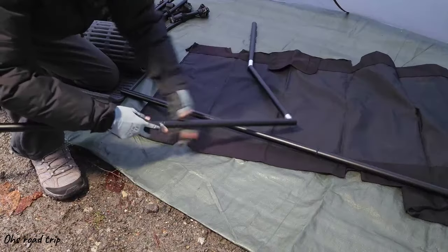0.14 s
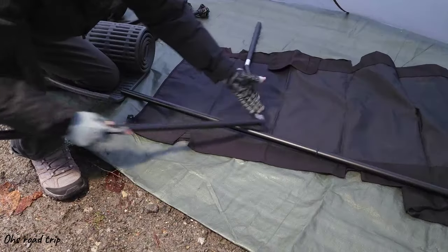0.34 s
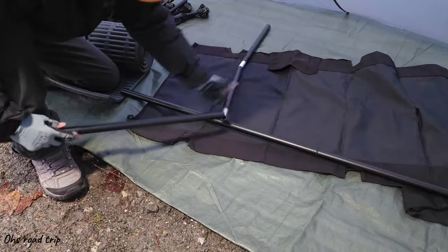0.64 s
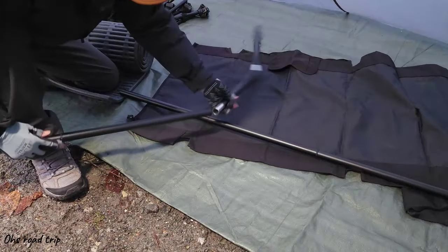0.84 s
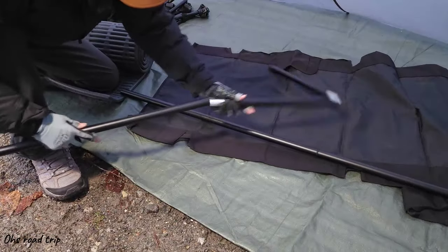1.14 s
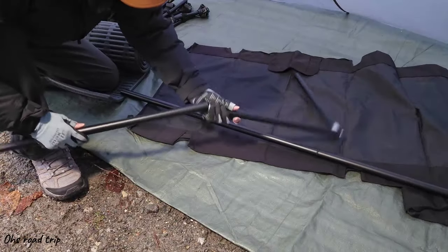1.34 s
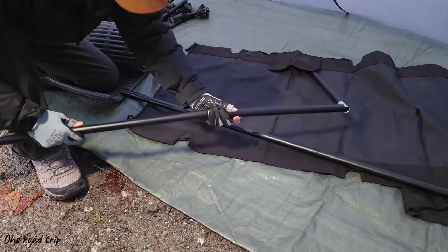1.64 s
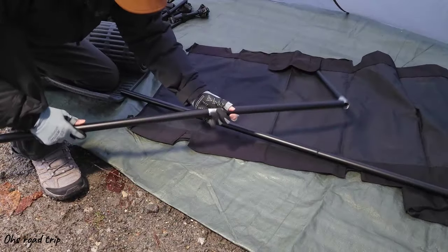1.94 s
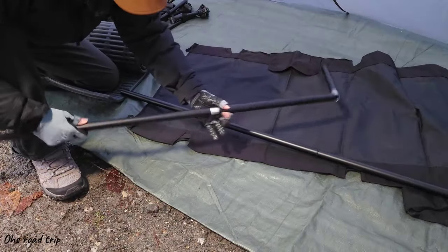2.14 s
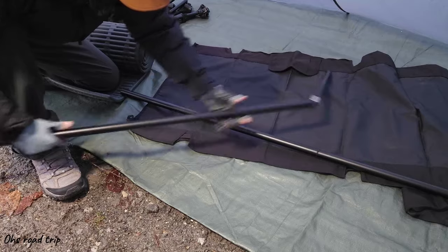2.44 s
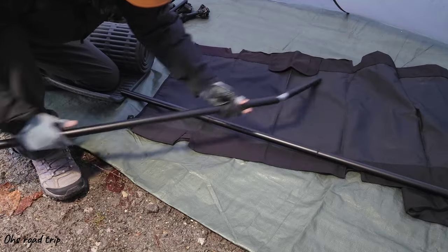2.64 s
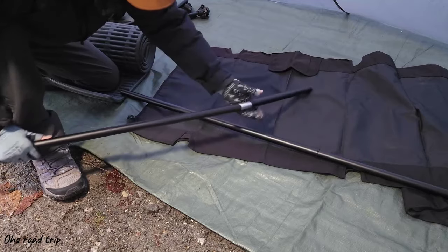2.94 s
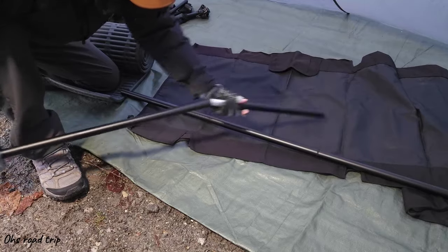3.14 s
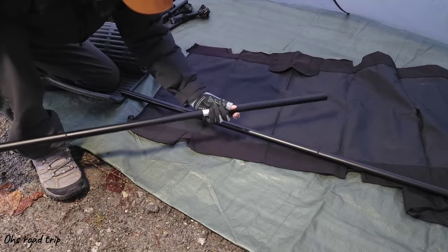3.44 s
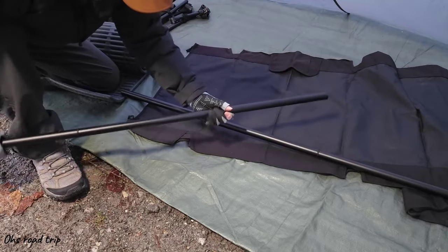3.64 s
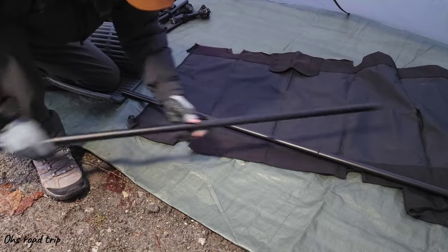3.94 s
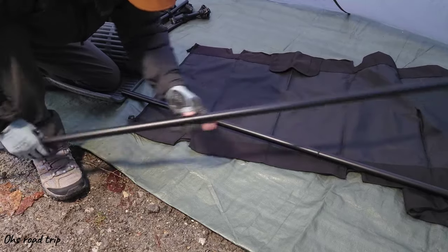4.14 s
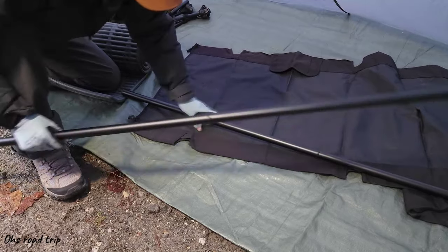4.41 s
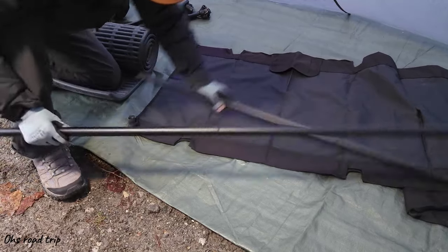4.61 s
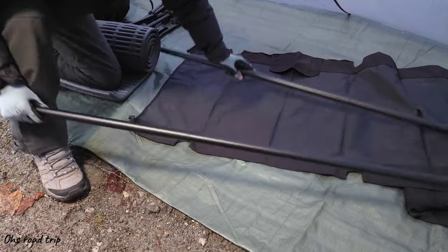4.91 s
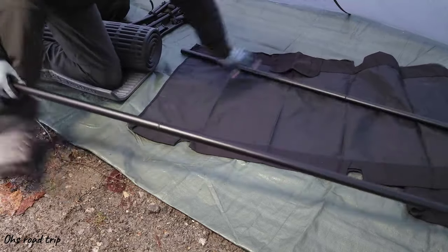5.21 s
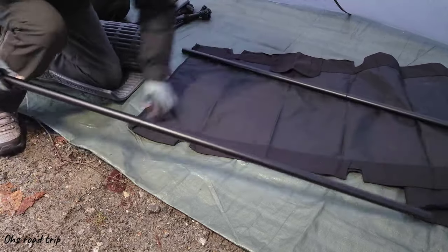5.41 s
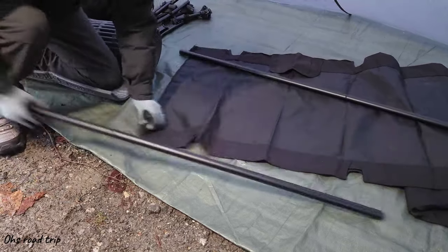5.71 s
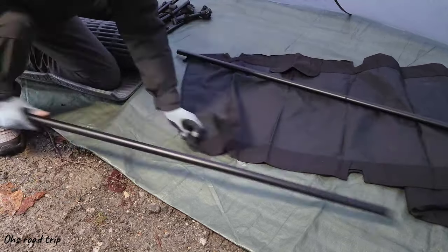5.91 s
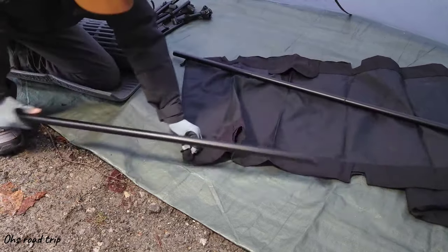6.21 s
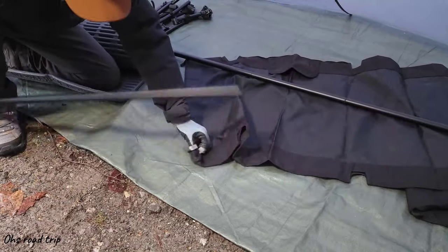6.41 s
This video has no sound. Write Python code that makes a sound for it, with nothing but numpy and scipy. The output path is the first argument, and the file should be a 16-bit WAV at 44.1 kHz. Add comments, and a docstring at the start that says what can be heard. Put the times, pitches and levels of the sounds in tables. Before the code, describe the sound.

Close, crisp clacks of thin metal tubes: a quick rattling cluster near the first second, then sharp lone snaps around two and three and a half seconds, and harder knocks with a dull ground bump near five. Short raspy slides and dry rustles of gloves, sleeves and canvas fill the gaps. Close stereo pickup, short soft fabric reflections, faint low motor drone far away.

```python
"""Putting up a camp cot

Jointed metal poles slide and snap into their sockets, then knock together: noise bursts over ringing modes.
Gloves, sleeves and canvas rub between the blows as swelling filtered noise; dull bumps land on the groundsheet.
The tent adds a short splash to knocks, slides and cloth. Two drifting tones drone as a motor far off."""
import sys
import numpy as np
from scipy import signal
from scipy.fft import rfft, irfft
from scipy.io import wavfile

SR = 44100
rng = np.random.default_rng(int(sys.argv[2]) if len(sys.argv) > 2 else 0)


def pcm_store(signal):
    """Save signal as 16-bit PCM."""
    levels = np.round(np.clip(np.atleast_2d(signal), -1, 1) * 32767)
    wavfile.write(sys.argv[1], SR, levels.astype(np.int16).T)


N = 289296
TIME = np.arange(N) / SR
FREQ = np.maximum(np.fft.rfftfreq(N, 1 / SR), 1)

# Levels in the tables are mix levels before the layer trims set in each function.
# knocks of metal on metal: start_s, level_db, clack_db, sizzle_db, ring_db (these three relative to level),
# body_hz, rattle_t60_s, contact_s
METAL_KNOCKS = [(.883,-19.5,0,-10,-6,1433,0.31,0.005), (0.924,-27.5,-4,9.5,-17,3870,.27,0.012),
                (1.046,-24.5,2,-4,-3,2293,0.11,0.0021), (1.148,-17.5,-1,-8,-11.5,2983,0.19,0.0027),
                (1.384,-48.5,13,-13,-11,1855,.18,0.0024), (1.552,-35,-2,-24,5,1960,0.17,0.00063),
                (2.128,-37,-16,-12,10,2280,.12,0.0023), (2.1703,-9,-3.5,-3.5,-7.5,2450,.21,0.00078),
                (2.287,-49.5,5,-15,-7,2500,.09,0.00094), (2.9,-41.5,0.5,-1,-6,1987,0.17,0.012),
                (3.402,-34,-8.5,-13,10,2200,0.16,0.00073), (3.5598,-11.5,-2.5,3,-12,2170,0.2,.00025),
                (3.69,-45,-2,-19,-7.5,2420,0.21,0.0038), (3.8939,-51,6,7,-12.5,2110,.14,0.00079),
                (4.05,-48.5,0.5,-10,-9,1960,0.21,0.0046), (4.1331,-28.5,-11,-5,-5.5,2600,0.15,0.0014),
                (4.229,-45.5,2,-11,-17,2014,0.38,.006), (4.967,-16.5,-7.5,-14,-23,2920,0.023,0.00035),
                (5.21,-12,-7.5,1.5,-6,1704,.17,0.003), (5.3839,-39,17,5,-19,2737,0.28,0.00032),
                (5.422,-31.5,-7,-26,-17,2380,.07,.0003), (5.535,-36.5,-2.5,-9,-11,3340,0.13,.003),
                (5.565,-32.5,3,-16,-4,1750,0.16,0.005), (6.2837,-33.5,-5.5,-18,-6,2250,0.28,.0022),
                (6.468,-21,-9,-10,-22.5,2309,.2,0.0024)]
# scrapes of a joint or a glove along a pole: start_s, length_s, level_db, low_db, ring_db (both relative)
POLE_SCRAPES = [(0.757,0.008,-33,-8,-7), (0.781,0.047,-37.5,-17,-17), (0.877,0.019,-21.5,-13,-14),
                (1.036,0.015,-35,-7,-22), (1.046,0.094,-39.5,-10,-22), (1.244,0.029,-36,-4.5,-12),
                (1.433,0.03,-40.5,0,5), (1.661,0.019,-30.5,-6.5,-6.5), (2.092,0.054,-34,-8,2.5),
                (3.006,0.061,-41,-12,-27), (3.282,0.0064,-52,-13,-20), (3.38,0.017,-42.5,-7,-13),
                (3.519,0.032,-34,-15.5,-10), (4.297,0.016,-58,-22,11), (4.35,0.025,-55.5,-11,10),
                (4.396,0.042,-37.5,-4.5,-45), (4.557,0.014,-44.5,-22,-0.5), (4.984,0.018,-44,-23,14),
                (5.127,.06,-36,-8.5,-20), (5.318,0.052,-35,-6.5,-18), (6.083,0.087,-37,-7.5,-25),
                (6.478,0.063,-36.5,-4.5,-14)]
# a pole's ringing modes, a close cluster: nominal_hz, level_db, t60_s
TUBE_MODES = [(5286, -3, .37), (5311, -5, .34), (5398, -2, .22), (5420, -4, .2), (5510, -6, .14)]
# stiff modes that only a hard blow wakes: nominal_hz, level_db, t60_s
HARD_MODES = [(780, -19, .07), (2150, -9, .08), (3935, -6, .11), (5820, -14, .1), (6560, -13, .11),
              (7440, -13, .11), (7700, -13, .12), (8400, -16, .1), (8890, -14, .08), (14850, -22, .11),
              (15400, -26, .1)]
# colour of metal on metal: freq_hz, gain_db
METAL_COLOUR = [(220, -11.5), (330, -7), (550, -9.5), (780, -2), (930, -7.5), (1400, -4), (2200, 0.5),
                (3200, -2), (4100, -2), (4900, -11), (5600, -4.5), (7000, -6.5), (9000, -9.5), (10500, -12),
                (13800, -9), (16000, -3.5)]
# broad resonances shared by metal and cloth, perhaps of the microphone housing, at full share:
# centre_hz, width_hz, lift_db
SHARED_RESONANCES = [(5560, 410, 6.5), (6330, 460, 5), (7540, 150, 12.5), (8340, 1600, 8), (15070, 580, 10)]
# dull bumps of a pole or a knee on the groundsheet: start_s, level_db, centre_hz
GROUND_BUMPS = [(.884,-28,1210), (1.151,-36,476), (1.279,-51,500), (1.388,-40,597), (1.45,-36,522),
                (5.127,-35.5,440), (5.188,-32,1016), (5.201,-19,1357), (5.211,-27,1440), (5.21,-29,332),
                (5.321,-26.5,488), (5.566,-37,710), (6.165,-36,620)]
# colour of rubbed cloth: freq_hz, gain_db
CLOTH_COLOUR = [(150, -18), (250, -2), (429, -2), (484, 1), (710, 3.5), (1010, -7), (1220, -4),
                (1420, -5.5), (1550, -5), (2200, -4), (2490, -6), (7570, -3), (10700, -7), (14900, -3.5),
                (16000, -42)]
# strokes of glove and sleeve over canvas: start_s, length_s, hiss_db, rustle_db, nylon_swish_db
# (the last two relative to hiss)
CLOTH_STROKES = [(-.06,0.091,-42.5,-5,-7), (0.168,0.18,-48,-2,-15), (0.341,0.18,-44,-2,-14),
                 (.57,0.12,-52,-0.5,-14), (0.688,0.03,-42.5,-2.5,-8), (.77,0.18,-44.5,-1.5,2),
                 (1.03,0.13,-39,-8.5,-8), (1.19,0.18,-45.5,-1,-14), (1.35,0.27,-54.5,2,-16),
                 (1.66,0.12,-57,-6,-16), (1.86,.1,-55.5,0.5,-12), (1.96,.07,-45.5,-1,-20),
                 (2.079,0.084,-36,-8,-18), (2.249,0.2,-59.5,-3.5,-14), (2.398,0.12,-49,-6.5,-3),
                 (2.57,0.11,-47.5,-4,-3), (2.73,0.2,-53,-2.5,-3), (3.2,0.21,-62,-1,-15),
                 (3.39,0.17,-52,-4.5,-12), (3.78,.1,-54,-24.5,1.5), (3.86,0.31,-49,-8,0),
                 (4.2,0.22,-66,6.5,-14.5), (4.38,0.14,-47.5,-5.5,-9), (4.5,.25,-45.5,-6.5,-8),
                 (4.758,0.15,-40,-9,-4), (4.95,0.31,-44.5,-3.5,-6), (5.42,0.16,-49,-1,-14),
                 (5.54,0.26,-40.5,-1.5,-5), (5.801,.36,-42,-2,-5), (6.19,0.26,-46.5,-2.5,-12),
                 (6.45,0.084,-40,-9,-2)]
# a knee or boot shifts on the groundsheet: start_s, length_s, level_db
GROUND_SHUFFLES = [(4.622, 0.17, -49.5), (6.444, .11, -52.5)]
# hollow rush of a pole drawn through the hand: start_s, length_s, centre_hz, glide_hz_per_s, level_db
POLE_DRAWS = [(0.783,0.076,1440,-400,-49), (1.072,0.097,1496,-400,-45), (1.22,0.26,1503,798,-48.5),
              (1.563,0.085,1395,0,-51), (1.89,.12,1405,2,-56), (2.474,0.113,1953,-2000,-57.5),
              (2.593,.16,1452,-800,-54.5), (3.025,0.032,1650,3998,-49.5)]
# far motor, two slowly drifting tones: time_s, pitch_hz, level_db
MOTOR_LOW = [(0,62.07,-50.5), (1.6,62.6,-45.5), (3.2,65,-50), (3.7,65,-58.5), (5.3,65.8,-55),
             (6.56,72.9,-45.5)]
MOTOR_HIGH = [(0,105.1,-43), (.5,105,-52.5), (1.4,105,-47.5), (3.3,105.4,-47), (4.2,105,-55.5),
              (5.2,103.7,-48), (6.2,103.7,-38), (6.56,102,-40.5)]
# colour of the outdoor rumble: freq_hz, gain_db
RUMBLE_COLOUR = [(20, -20.5), (40, -12.5), (55, -4), (75, -3.5), (95, -0.5), (125, -5.5), (160, -7),
                 (205, -7.5), (250, -16.5), (400, -24), (900, -34)]
# level of the outdoor rumble: time_s, level_db
RUMBLE_CURVE = [(0,-53), (2.1,-51.5), (2.4,-57.5), (4.2,-56), (4.8,-50.5), (6.56,-51.5)]
# level of the outdoor wash in the low mids: time_s, level_db
WASH_CURVE = [(0,-57.5), (2.1,-60), (2.4,-71), (3.8,-66.5), (4.4,-61.5), (6.56,-51)]

THUD_DB = -15.5  # low thud of a medium knock, relative to its clack before trims
THUD_SLOPE = -0.32  # dB per dB of level: light knocks are duller than hard ones
MEDIUM_KNOCK_DB = -33
STROKE_ATTACK_S, STROKE_T60_S = 0.049, 0.4  # a stroke gathers speed, holds, then dies away
REST_DB = -64.5  # faint stir of clothing between strokes, before trims
FLAP_DB = -13.5  # canvas flap with each stroke, relative to its rustle before trims
CEILING, TOP_HZ = 0.9, 15850  # full scale = 1; upper edge of the sound


def knocks(crack_s=0.0026, crack_db=4, rattle_db=-6, low_life=0.18, mid_life=0.14, clack_trim_db=-3,
           body_trim_db=-4, body_cutoff_hz=220, bright_db=-2, sizzle_trim_db=-2, ring_trim_db=-2,
           hard_db=2, hardness=2.07):
    """Each blow is a crack, a rattle of the loose joint, a hollow body note and the ring of the tube."""
    t = np.arange(SR // 2) / SR
    thud, clack, bright, sizzle, body, ring = (np.zeros((2, N)) for _ in range(6))
    narrow = signal.butter(1, body_cutoff_hz, fs=SR, output="sos")

    for start, level_db, clack_db, sizzle_db, ring_db, body_hz, t60, contact in METAL_KNOCKS:
        thud_db = clack_db + THUD_DB + THUD_SLOPE * (level_db - MEDIUM_KNOCK_DB)
        crack = undb(crack_db) * np.exp(-np.maximum(t - contact, 0) / crack_s)
        onset = undb(level_db) * np.minimum(t / contact, 1)

        def blow(life):
            rattle = undb(rattle_db) * fade(t, max(t60 * life, 0.01))
            return onset * np.hypot(crack, rattle)

        # the low and middle bands die sooner than the treble, damped by the hand and the ground
        low_blow, mid_blow, full_blow = blow(low_life), blow(mid_life), blow(1)
        add(thud, start, undb(thud_db) * low_blow * stereo(0.37, len(t)))
        add(clack, start, undb(clack_db + clack_trim_db) * mid_blow * stereo(0.07, len(t)))
        add(bright, start, undb(bright_db) * full_blow * stereo(0, len(t)))
        add(sizzle, start, undb(sizzle_db + sizzle_trim_db) * full_blow * stereo(0, len(t)))

        # slow noise carried on a tone makes a narrow, hollow note
        hollow = signal.sosfilt(narrow, stereo(0.77, len(t))) * np.sin(2 * np.pi * body_hz * t)
        add(body, start, undb(clack_db + body_trim_db) * mid_blow * unit(hollow))

        tube = ringing(TUBE_MODES, t, bloom_s=0.0046, detune=0.00115)
        add(ring, start, undb(level_db + ring_db + ring_trim_db) * tube)
        # stiff modes grow faster than the blow
        stiff = ringing(HARD_MODES, t, bloom_s=0.00097, detune=0.0098)
        add(ring, start, undb(hardness * level_db + hard_db) * stiff)

    metal = shape(METAL_COLOUR, 0.95)
    blows = colour(thud, metal * band(272, 1110))
    blows += colour(clack, metal * band(1270, 4560))
    blows += colour(bright, metal * band(4550, 10000))
    blows += colour(sizzle, metal * band(7400, 23700))
    blows += undb(-5) * colour(body, band(1020, 8100))
    return ring + tent(blows, wet_db=-2, t60=0.11)


def ringing(modes, t, bloom_s, detune, waver=0.47, waver_hz=45, settle_s=0.15):
    """Decaying modes, rough while metal touches and purer once free; each blow lands on another section."""
    slow = signal.butter(2, waver_hz, fs=SR, output="sos")
    roughness = waver * np.exp(-t / settle_s)
    out = 0
    for nominal_hz, db, t60 in modes:
        sway = unit(signal.sosfilt(slow, rng.standard_normal((2, len(t)))))
        hz = nominal_hz * (1 + detune * rng.standard_normal())
        # start phase in cycles, slightly different in each ear
        start_phase = rng.random() + 0.19 * rng.standard_normal((2, 1))
        phase = 2 * np.pi * (hz * t + start_phase)
        out = out + undb(db) * fade(t, t60) * (np.sin(phase) + roughness * sway * np.cos(phase))
    return out * (1 - np.exp(-t / bloom_s))


def scrapes(grain_db=-1.0, catch_db=3.0, swell=0.21, tail_t60=0.13, low_trim_db=1, ring_trim_db=-1):
    """Short slides: metal catches and slips, a bright rasp that sets the tube ringing."""
    high, low, ring = np.zeros((1, N)), np.zeros((1, N)), np.zeros((2, N))
    t = np.arange(SR // 2) / SR
    for start, length, level_db, low_db, ring_db in POLE_SCRAPES:
        # a longer stroke takes longer to gather speed
        rise = 1 - np.exp(-t / (swell * length))
        envelope = undb(level_db) * rise * fade(np.maximum(t - length, 0), tail_t60)
        add(high, start, envelope[None])
        add(low, start, undb(low_db) * envelope[None])
        tube = ringing(TUBE_MODES, t, bloom_s=0.0029, detune=0.0014)
        add(ring, start + length / 2, undb(level_db + ring_db + ring_trim_db) * tube)

    friction = stereo(0.073) * unit(undb(grain_db * walk(900) + catch_db * walk(90)))
    metal = shape(METAL_COLOUR, 0.28)
    slides = colour(friction * high, metal * band(4300, 15100))
    slides += undb(low_trim_db) * colour(friction * low, metal * band(216, 3340))
    return ring + tent(slides, wet_db=-5, t60=0.064)


def bumps(t60=0.054, rise_s=0.0034, spread=0.24):
    """Soft contacts: a broad, quickly damped resonance of the ground."""
    out = np.zeros((2, N))
    t = np.arange(SR // 5) / SR
    envelope = fade(t, t60) * (1 - np.exp(-t / rise_s))
    for start, db, hz in GROUND_BUMPS:
        broad = signal.butter(2, hz * spread, fs=SR, output="sos")
        noise = signal.sosfilt(broad, stereo(0.84, len(t))) * np.sin(2 * np.pi * hz * t)
        add(out, start, undb(db) * unit(noise) * envelope)
    return out


def cloth(grain_db=-0.2, crease_db=0.68, hiss_trim_db=1, rustle_trim_db=1, swish_trim_db=0,
          tick_db=-14, tick_spread_db=5):
    """Fibres catch in fine grains, creases give way unevenly and now and then snap with a small tick."""
    hiss, rustle, flap, swish = rubbing()
    grains = unit(undb(grain_db * walk(1200) + crease_db * walk(45)))

    # about forty crease ticks a second, each a millisecond or two long
    tick_gain = undb(tick_spread_db * np.clip(rng.standard_normal(N), -2, 2))
    ticks = (rng.random(N) < 40 / SR) * tick_gain
    ticks = unit(signal.fftconvolve(ticks, fade(TIME[:SR // 50], 0.01))[:N])
    creased = np.hypot(grains, undb(tick_db) * ticks)

    fabric = shape(CLOTH_COLOUR, 0.35)
    out = colour(stereo(0.037) * grains * hiss * undb(hiss_trim_db), fabric * band(3860, 17900))
    out += colour(stereo(0.017) * creased * rustle * undb(rustle_trim_db), fabric * band(1055, 4600))
    out += colour(stereo(0.48) * creased * flap, fabric * band(240, 1350))
    out += colour(stereo(0) * grains * swish * undb(swish_trim_db), band(14000, 16100, order=70))
    return tent(out, wet_db=-9.5, t60=0.28)


def rubbing(rest_rustle_db=-3):
    """Gains of hiss, rustle, flap and swish; overlapping movements add in power."""
    hiss, rustle, swish = undb(REST_DB) ** 2, undb(REST_DB + rest_rustle_db) ** 2, 0
    for start, length, db, rustle_db, swish_db in CLOTH_STROKES:
        power = stroke(start, length, db, STROKE_ATTACK_S, STROKE_T60_S) ** 2
        hiss = hiss + power
        rustle = rustle + power * undb(rustle_db) ** 2
        swish = swish + power * undb(swish_db) ** 2
    flap = rustle * undb(FLAP_DB) ** 2
    for start, length, db in GROUND_SHUFFLES:
        flap = flap + stroke(start, length, db, STROKE_ATTACK_S, STROKE_T60_S) ** 2
    return np.sqrt([hiss, rustle, flap, swish])


def stroke(start, length, db, attack_s, t60):
    """Gain of one rubbing movement: a smooth rise, a hold and an exponential release."""
    rise = np.sin(np.pi / 2 * np.clip((TIME - start) / attack_s, 0, 1)) ** 2
    return undb(db) * rise * fade(np.maximum(TIME - start - length, 0), t60)


def rush(cutoff_hz=190, attack_s=0.016, t60=0.13):
    """Friction noise in a hollow resonance that glides as the grip moves."""
    lowpass = signal.butter(2, cutoff_hz, fs=SR, output="sos")
    # complex noise, so that the carrier shifts its band up in one piece
    narrow = signal.sosfilt(lowpass, stereo(0.15) + 1j * stereo(0.31))
    resonance = 0
    for start, length, hz, glide, db in POLE_DRAWS:
        centre = hz + glide * np.clip(TIME - start, 0, length)
        carrier = np.exp(2j * np.pi * np.cumsum(centre) / SR)
        resonance = resonance + stroke(start, length, db, attack_s, t60) * carrier
    return np.real(narrow * resonance) / np.std(narrow.real)


def outdoors(drone_trim_db=-2, rumble_trim_db=6):
    """A far motor over low rumble, nearly the same in both ears, and a faint wider wash above it."""
    rumble = colour(stereo(0.99), shape(RUMBLE_COLOUR) * band(13.5, 138.6))
    rumble += undb(-8.0) * colour(stereo(0.93), shape(RUMBLE_COLOUR) * band(160, 1050))
    out = unit(rumble) * undb(curves(RUMBLE_CURVE)[0] + rumble_trim_db)
    out += colour(stereo(0.13), band(213, 1000, order=6)) * undb(curves(WASH_CURVE)[0])
    for table in (MOTOR_LOW, MOTOR_HIGH):
        hz, db = curves(table)
        waver_db = 1.3 * walk(7)
        tone = np.sqrt(2) * np.sin(2 * np.pi * np.cumsum(hz) / SR)
        out += tone * undb(db + drone_trim_db + waver_db)
    return out


def tent(x, wet_db, t60, gap_s=0.0026):
    """Direct sound and a short, dense spray of reflections from the groundsheet and walls."""
    t = np.arange(SR // 5) / SR
    response = stereo(0.21, len(t)) * fade(t, t60) * (1 - np.exp(-t / gap_s))
    response *= undb(wet_db) / np.sqrt(np.sum(response ** 2, axis=1, keepdims=True))
    response[:, 0] += 1  # the direct sound
    return signal.fftconvolve(x, response, axes=1)[:, :N] / np.hypot(1, undb(wet_db))


def shape(points, resonance_share=0):
    """Gain per frequency from (Hz, dB) points, lifted at the shared resonances."""
    hz, db = np.transpose(points)
    lift_db = sum(lift / (1 + (2 * (FREQ - f) / width) ** 2) for f, width, lift in SHARED_RESONANCES)
    return undb(np.interp(np.log(FREQ), np.log(hz), db) + resonance_share * lift_db)


def band(lo_hz, hi_hz, order=10):
    """Gain per frequency of a soft-edged band."""
    return 1 / np.sqrt((1 + (lo_hz / FREQ) ** order) * (1 + (FREQ / hi_hz) ** order))


def colour(x, gain):
    """Causal filter of unit power with the given gain per frequency."""
    # folding the cepstrum onto positive time gives minimum phase
    cepstrum = irfft(np.log(unit(gain) + 1e-5), N)
    cepstrum[1:N // 2] *= 2
    cepstrum[N // 2 + 1:] = 0
    response = irfft(np.exp(rfft(cepstrum)), N)[:SR // 4]
    return signal.fftconvolve(x, response[None], axes=1)[:, :N]


def stereo(likeness, size=N):
    """Left and right noise with the given correlation."""
    mid, side = rng.standard_normal((2, size))
    spread = np.sqrt(1 - likeness) * np.array([side, -side])
    return (np.sqrt(1 + likeness) * mid + spread) / np.sqrt(2)


def walk(rate):
    """Random curve of rms 1, joining `rate` random points a second by straight lines."""
    count = N // 20
    return unit(np.interp(TIME * rate, np.arange(count), rng.standard_normal(count)))


def fade(t, t60):
    """Exponential decay that loses 60 dB in t60 seconds."""
    return np.exp(-np.log(1000) * t / t60)


def curves(table):
    """Each column after the first as a curve in time."""
    time_s, *columns = np.transpose(table)
    return [np.interp(TIME, time_s, column) for column in columns]


def add(track, start, sound):
    """Mix a sound into a track at a time in seconds."""
    i = int(start * SR)
    track[:, i:i + sound.shape[1]] += sound[:, :N - i]


def undb(db):
    """Decibels to gain."""
    return 10 ** (np.asarray(db) / 20)


def unit(x):
    """Scale to rms 1."""
    return x / np.sqrt(np.mean(x ** 2) + 1e-20)


def scene():
    """Poles, groundsheet, cloth and the outdoors together."""
    return knocks() + scrapes() + bumps() + cloth() + rush() + outdoors()


def record(dry):
    """Round the loudest peaks and cut the top steeply."""
    rounded = dry / (1 + (dry / CEILING) ** 4) ** (1 / 4)
    return signal.sosfilt(signal.ellip(10, 0.2, 70, TOP_HZ, fs=SR, output="sos"), rounded)


dry = scene()
out = record(dry)
pcm_store(out)
```